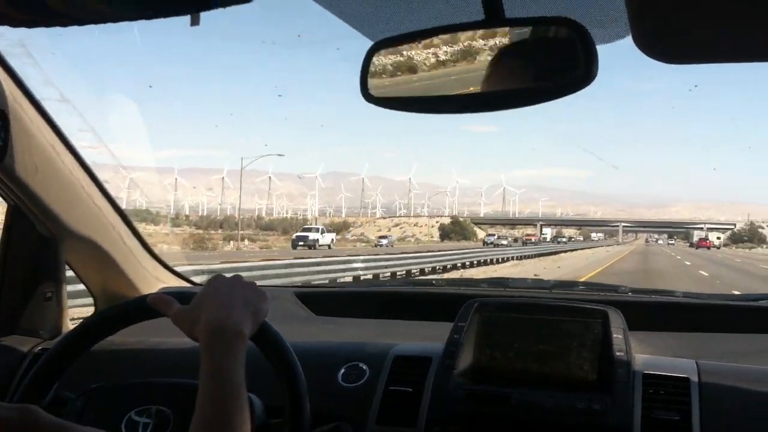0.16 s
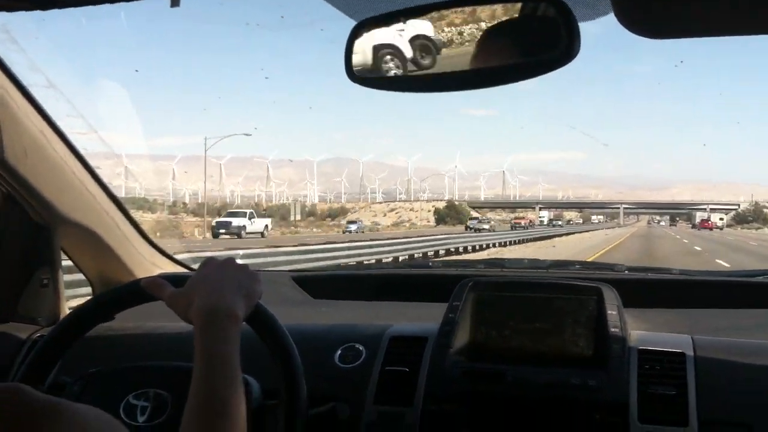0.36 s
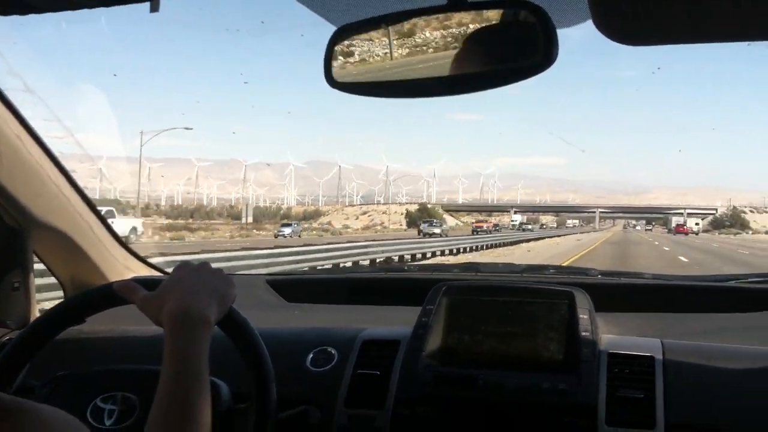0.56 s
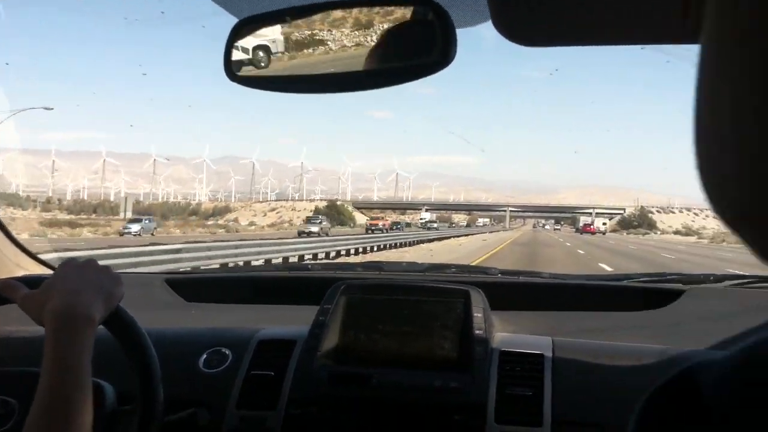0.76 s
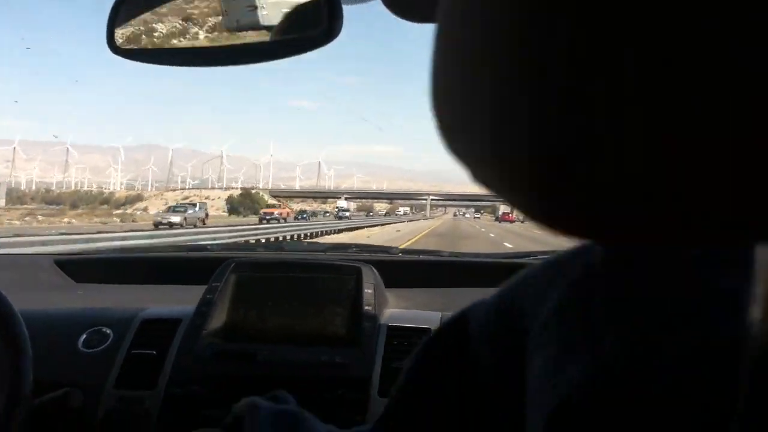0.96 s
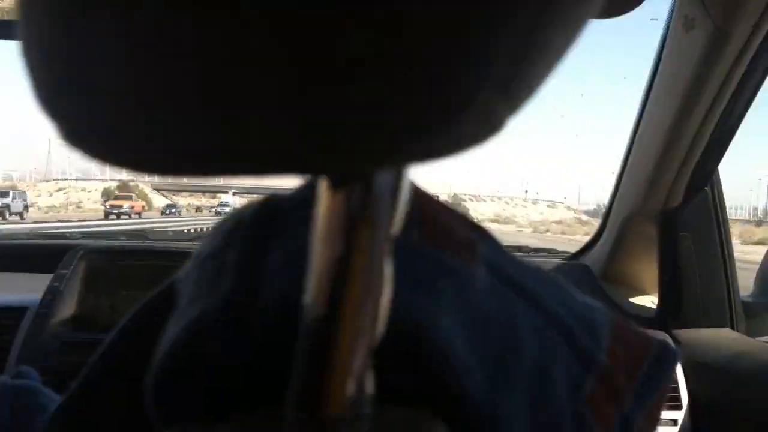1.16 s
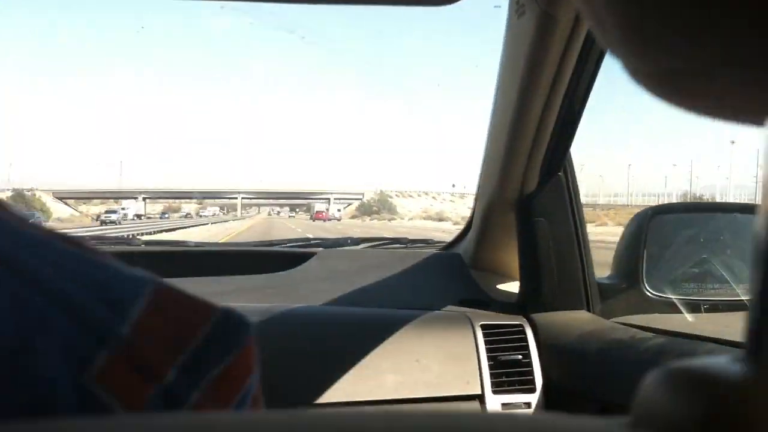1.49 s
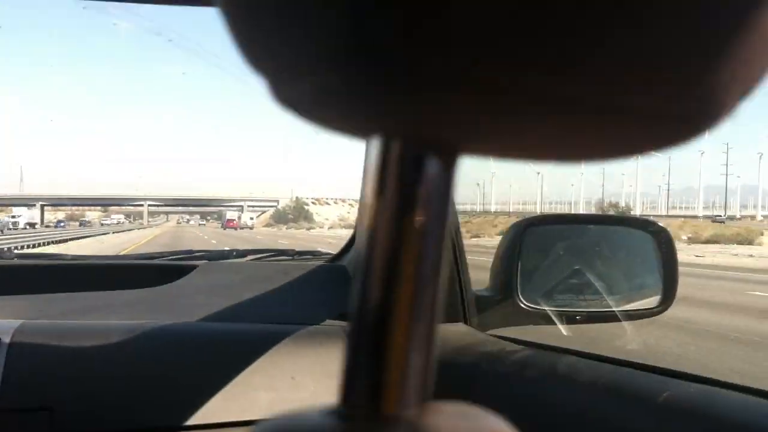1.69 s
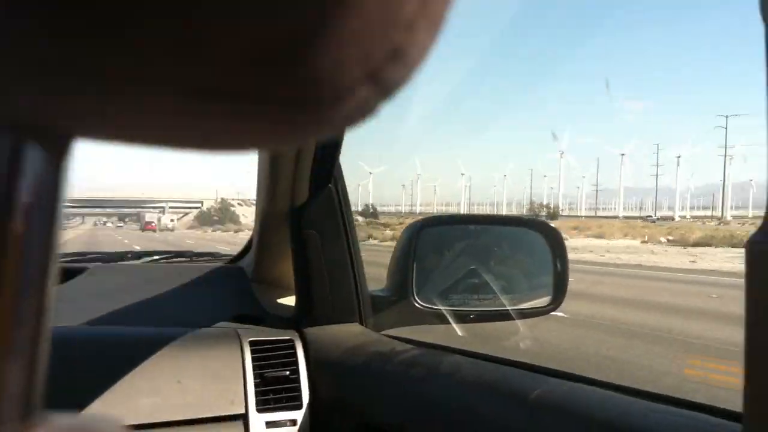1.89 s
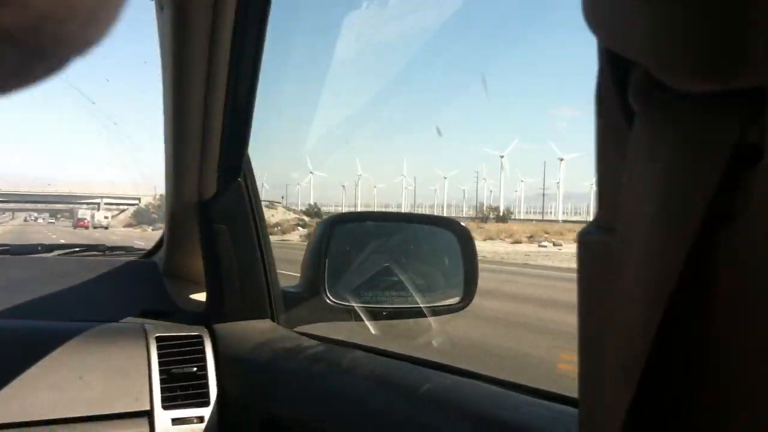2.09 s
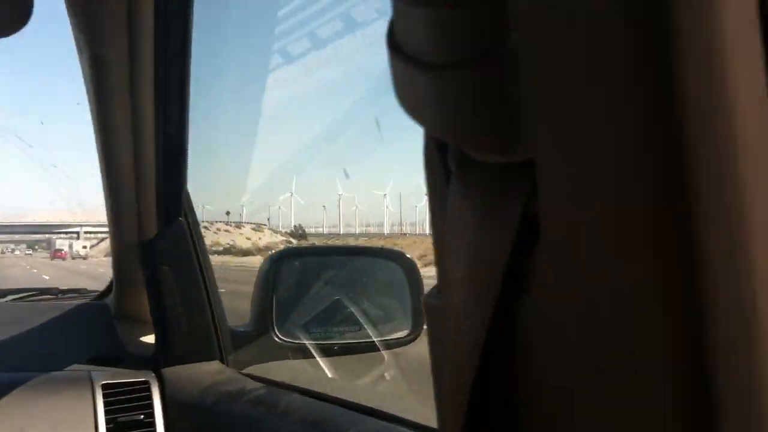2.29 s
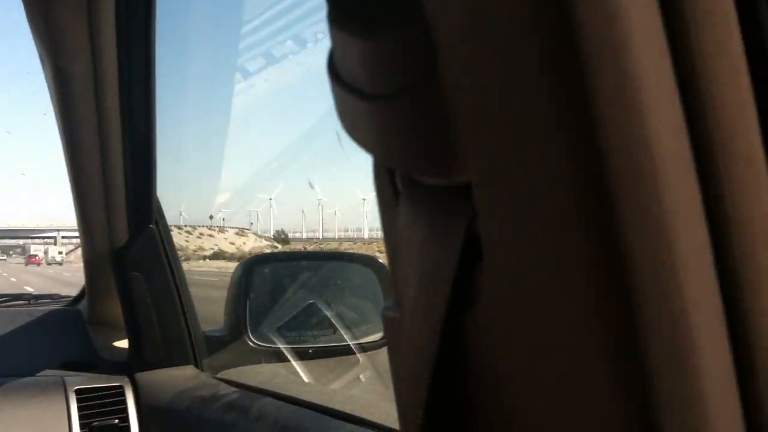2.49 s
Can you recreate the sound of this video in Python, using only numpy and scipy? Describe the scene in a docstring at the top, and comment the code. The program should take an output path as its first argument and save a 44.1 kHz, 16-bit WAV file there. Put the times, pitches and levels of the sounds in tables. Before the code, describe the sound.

Car interior drone on a highway: booming road noise, tyre roar, soft wind hiss, slight handling rustle

```python
"""Inside a car at highway speed, heard from the back seat while the microphone turns to the side window.
The road makes the cabin boom and drone; the tyres roar, ring and whine faintly: shaped noise and resonances.
A hollow band of the roar glides upward and a corner booms; wind hisses along the glass and the window seal.
An oncoming vehicle, a brief swell of noise, fades away at the start.
Faint handling ticks, puffs and dull rings of noise, lie over a grainy rustle."""
import sys
import numpy as np
from scipy import signal
from scipy.fft import rfft, irfft, next_fast_len
from scipy.io import wavfile
from scipy.ndimage import map_coordinates

SR = 44100
rng = np.random.default_rng(int(sys.argv[2]) if len(sys.argv) > 2 else 0)


def generate_wav(sig):
    """Save sig (samples, or channels by samples) to the path in sys.argv[1] as 16-bit PCM at SR."""
    pcm = np.round(np.clip(np.atleast_2d(sig).T, -1, 1) * 32767).astype(np.int16)
    wavfile.write(sys.argv[1], SR, pcm)


N = 116865  # length [samples]


def amp(db):
    """Level law: decibels to amplitude gain."""
    return 10 ** (np.asarray(db) / 20)


def unit(x):
    """Normalisation: scale to rms 1."""
    return x / np.sqrt(np.mean(x ** 2) + 1e-20)


def curve(rows):
    """Linear interpolation: (time [s], value) points as one value per sample."""
    times, values = np.transpose(rows)
    return np.interp(np.arange(N) / SR, times, values)


def wobble(rate):
    """Slow random modulation: a smooth curve through random knots, rate knots a second."""
    knots = rng.standard_normal(size=1024)
    return map_coordinates(knots, [np.arange(N) * rate / SR], mode="wrap")


def noise(response):
    """Spectral shaping: white noise filtered by a gain per frequency, at rms 1."""
    m = next_fast_len(N + 8192)
    spectrum = rfft(rng.standard_normal(m))
    gain = response(np.fft.rfftfreq(m, 1 / SR))
    return unit(irfft(spectrum * gain, m)[:N])


def rush(spectrum):
    """Broadband noise: spectral density interpolated between points on a log frequency axis."""
    hz, db = np.transpose(spectrum)
    return noise(lambda f: amp(np.interp(np.log(f + 1), np.log(hz), db)))


def ringing(hz, width_hz):
    """Driven resonance: random excitation sustains a narrow band, at half gain about width_hz off centre."""
    def response(f):
        damping = (2 * f * width_hz) ** 2
        return damping / ((f ** 2 - hz ** 2) ** 2 + damping)
    return noise(response)


# relative spectrum of the cabin boom: (frequency [Hz], density [dB per Hz])
BOOM_SPECTRUM = [(20, -42.5), (42, -36), (64, -18.5), (85, -14.5), (105, -7), (130, -.5), (150, -3),
                 (168, .5), (220, -4.5), (290, -11), (420, -24.5), (900, -77.5)]
# level of the boom: (time [s], level [dB])
BOOM_LEVEL_CURVE = [(0, -38), (.1, -36), (.21, -39), (.32, -35), (.5, -35.3), (.78, -36), (1.02, -33),
                    (1.33, -35.5), (1.43, -32.3), (1.66, -32), (1.75, -34), (1.88, -32.5), (2.22, -31),
                    (2.4, -33), (2.65, -32)]
# the cabin's lowest modes: (frequency [Hz], relative level [dB])
CABIN_MODES = [(130, -2), (167, 0)]
# joint level of those modes: (time [s], level [dB])
DRONE_LEVEL_CURVE = [(0, -44), (.4, -40), (1.3, -41), (1.5, -40), (1.8, -38), (2.15, -34.5), (2.65, -38)]
DRONE_WANDER_HZ, DRONE_WAVER_DB = 8, 1.5  # per unit of random wobble


def road():
    """Structure-borne sound: the road shakes the body, the cabin booms and its lowest modes drone unsteadily."""
    drone = 0
    for hz, db in CABIN_MODES:
        pitch = hz + DRONE_WANDER_HZ * wobble(18)
        phase = 2 * np.pi * np.cumsum(pitch) / SR
        drone = drone + amp(db + DRONE_WAVER_DB * wobble(11)) * np.sin(phase)
    boom = amp(curve(BOOM_LEVEL_CURVE)) * rush(BOOM_SPECTRUM)
    return boom + amp(curve(DRONE_LEVEL_CURVE)) * unit(drone)


# relative spectrum of the tyre roar: (frequency [Hz], density [dB per Hz])
ROAR_SPECTRUM = [(40, -59), (100, -19.5), (250, -2), (370, -0.5), (520, -4), (740, -9), (1000, -13),
                 (1300, -17.5), (1600, -22), (1850, -26), (2200, -32.5), (2800, -50), (5000, -77.5)]
# narrow resonances of tyres and cabin: (frequency [Hz], half-width [Hz], level [dB])
TYRE_RESONANCES = [(380, 26, -49), (585.6, 13, -54), (717, 18, -52)]
# level of the tread's fuzzy whine: (time [s], level [dB])
TREAD_LEVEL_CURVE = [(0, -62.5), (1.1, -63.5), (1.5, -58), (1.85, -65.5), (2.65, -66.5)]
TREAD_HZ, TREAD_WIDTH_HZ = 1750, 49  # centre and half-width
ROAR_DB = -36.5  # mean level


def tyres():
    """Rolling noise: a broad roar, a few randomly driven resonances and the whine of the tread."""
    roar = amp(ROAR_DB + 0.17 * wobble(8.8)) * rush(ROAR_SPECTRUM)
    rings = sum(amp(db) * ringing(hz, width) for hz, width, db in TYRE_RESONANCES)
    whine = amp(curve(TREAD_LEVEL_CURVE)) * ringing(TREAD_HZ, TREAD_WIDTH_HZ)
    return roar + rings + whine


# hollow band of the roar as the microphone turns: (time [s], centre [Hz], level [dB])
SURGE_PATH = [(0, 400, -60), (.95, 400, -54), (1.1, 400, -39), (1.28, 460, -38.5), (1.4, 460, -44),
              (1.52, 500, -39.5), (1.61, 680, -40), (1.78, 690, -42), (1.92, 720, -45.5),
              (2.09, 770, -41.5), (2.2, 800, -52), (2.65, 800, -60)]
SURGE_WIDTH_HZ = 115  # half gain this far from the centre
# level of the boom in the corner by the door: (time [s], level [dB])
CORNER_LEVEL_CURVE = [(0, -45), (1.1, -45), (2, -49), (2.25, -39), (2.38, -41.5), (2.53, -32),
                      (2.65, -38.5)]
CORNER_HZ, CORNER_WIDTH_HZ = 252.6, 34  # centre and half-width


def standing_waves():
    """Standing waves: a hollow band glides up as the microphone swings past the seats; the corner booms late."""
    times, centre_hz, level_db = np.transpose(SURGE_PATH)
    phase = 2 * np.pi * np.cumsum(curve(np.c_[times, centre_hz])) / SR

    def lowpass(f):
        return 1 / (1 + (f / SURGE_WIDTH_HZ) ** 4)

    # two slow noises on carriers in quadrature make one band around the moving centre
    surge = unit(noise(lowpass) * np.cos(phase) + noise(lowpass) * np.sin(phase))
    corner = amp(curve(CORNER_LEVEL_CURVE)) * ringing(CORNER_HZ, CORNER_WIDTH_HZ)
    return amp(curve(np.c_[times, level_db])) * surge + corner


# relative spectrum of the wind hiss: (frequency [Hz], density [dB per Hz])
HISS_SPECTRUM = [(900, -18), (2200, 2.5), (3000, 0), (4100, 1.5), (5100, -1), (6000, -6.5), (7200, -8.5),
                 (10000, -16.5), (13500, -27), (15500, -35)]
# level of the hiss: (time [s], level [dB])
HISS_LEVEL_CURVE = [(0, -63), (1.2, -63), (1.8, -64.5), (2.65, -64)]
# relative spectrum of air at the side window's seal: (frequency [Hz], density [dB per Hz])
SEAL_SPECTRUM = [(1200, -20), (2300, 1.5), (2900, -3), (3600, 2.5), (4200, -4.5), (5200, -11.5),
                 (9000, -38)]
# level of the seal as the microphone turns to it: (time [s], level [dB])
SEAL_LEVEL_CURVE = [(0, -90), (1.65, -70.5), (2.05, -65.5), (2.35, -61.5), (2.65, -62.5)]


def wind():
    """Aerodynamic noise: slightly fluttering turbulent hiss over the body and at the window seal."""
    hiss = amp(curve(HISS_LEVEL_CURVE) + 0.39 * wobble(12)) * rush(HISS_SPECTRUM)
    seal = amp(curve(SEAL_LEVEL_CURVE) + 0.6 * wobble(5.3)) * rush(SEAL_SPECTRUM)
    return hiss + seal


# relative spectrum of the oncoming vehicle: (frequency [Hz], density [dB per Hz])
ONCOMING_SPECTRUM = [(200, -22), (450, -0.5), (750, 0.5), (1000, -1), (1220, -5), (1550, -14),
                     (2300, -29.5), (4000, -54)]
PASS_S, PASS_WIDTH_S, PASS_DB = 0.1, 0.21, -42  # peak time, half-width at half gain, peak level


def oncoming():
    """Passing source: tyre noise from the other carriageway swells and fades with distance from the passing."""
    t = np.arange(N) / SR
    swell = 1 / (1 + ((t - PASS_S) / PASS_WIDTH_S) ** 2)
    return amp(PASS_DB) * swell * rush(ONCOMING_SPECTRUM)


# handling ticks: (time [s], puff level [dB], ring level [dB])
TICK_EVENTS = [(.106, -64, -60), (.325, -71, -78), (.505, -69, -71), (.524, -67, -70), (1.042, -68, -72),
               (1.067, -63.5, -69), (1.088, -64, -66), (1.112, -68, -68), (1.235, -69, -76),
               (1.261, -62, -68), (1.285, -68, -76), (1.313, -65, -75), (1.36, -65.5, -76),
               (1.383, -67, -75), (1.411, -63, -68), (1.436, -66, -70), (1.477, -67, -76),
               (1.505, -66, -76), (1.553, -68, -76), (1.608, -63, -73), (1.63, -69, -76),
               (1.661, -65.5, -66), (1.718, -69, -76), (1.95, -69, -73), (2.293, -65, -70),
               (2.345, -65, -67), (2.586, -64, -63)]
# relative spectrum of puffs and rustle: (frequency [Hz], density [dB per Hz])
TICK_SPECTRUM = [(1500, -15), (4000, 0), (8000, 1.5), (11000, -4), (13500, -9), (15000, -22)]
TICK_ATTACK_S, TICK_DECAY_S = .002, .005  # exponential time constants
TICK_RING_HZ, TICK_RING_WIDTH_HZ = 4370, 600  # centre and half-width
# level of the fine rustle: (time [s], level [dB])
RUSTLE_LEVEL_CURVE = [(0, -78), (.4, -83.5), (.95, -83.5), (1.08, -76), (1.45, -80), (1.7, -80), (1.8, -84),
                      (2.2, -80.5), (2.32, -78), (2.65, -83)]
RUSTLE_SCATTER_DB = 8.5  # bound of the grains' scatter, before normalisation
RUSTLE_KNOTS_PER_S = 150


def handling():
    """Impact and friction: each dry tick is a bright puff and a dead plastic ring, over a grainy rustle."""
    t = np.arange(N) / SR
    onsets, puff_db, ring_db = np.transpose(TICK_EVENTS)
    age = t - onsets[:, None]
    # rises before each tick's time, decays after it
    shapes = np.exp(-np.maximum(-age / TICK_ATTACK_S, age / TICK_DECAY_S))
    scatter = np.tanh(wobble(RUSTLE_KNOTS_PER_S) - 1)
    grains = unit(amp(RUSTLE_SCATTER_DB * scatter))
    puff_gain = amp(puff_db) @ shapes
    rustle_gain = amp(curve(RUSTLE_LEVEL_CURVE)) * grains
    # puffs and rustle add in power and share one noise
    puffs = np.hypot(puff_gain, rustle_gain) * rush(TICK_SPECTRUM)
    rings = amp(ring_db) @ shapes * ringing(TICK_RING_HZ, TICK_RING_WIDTH_HZ)
    return puffs + rings


def scene():
    """Superposition: the pressures of all sources add in the cabin, on one channel."""
    return (road() + tyres() + standing_waves() + wind() + oncoming() + handling())[None]


TOP_HZ = 15600  # cutoff of the band limit


def record(dry):
    """Band limitation: a steep low-pass filter removes the highest treble."""
    return signal.sosfilt(signal.butter(16, TOP_HZ, fs=SR, output="sos"), dry)


dry = scene()
out = record(dry)
generate_wav(out)
```